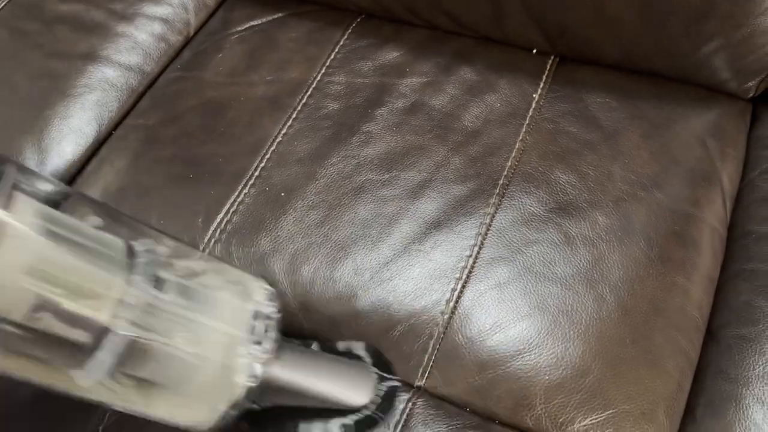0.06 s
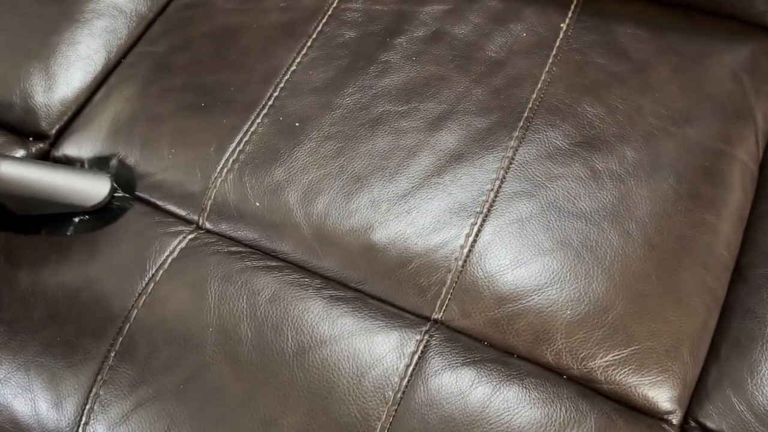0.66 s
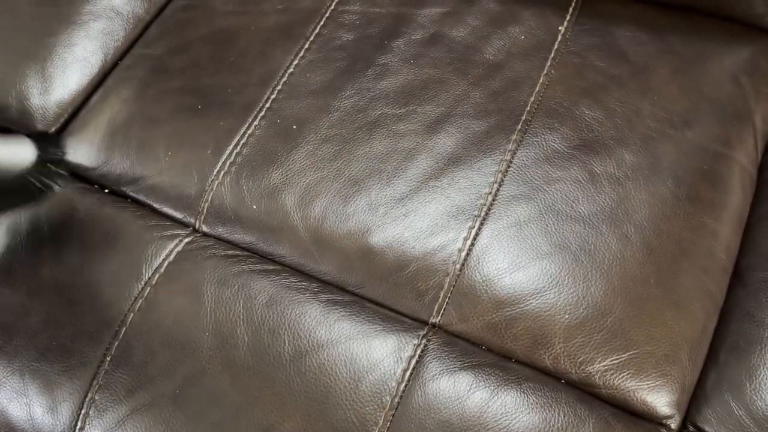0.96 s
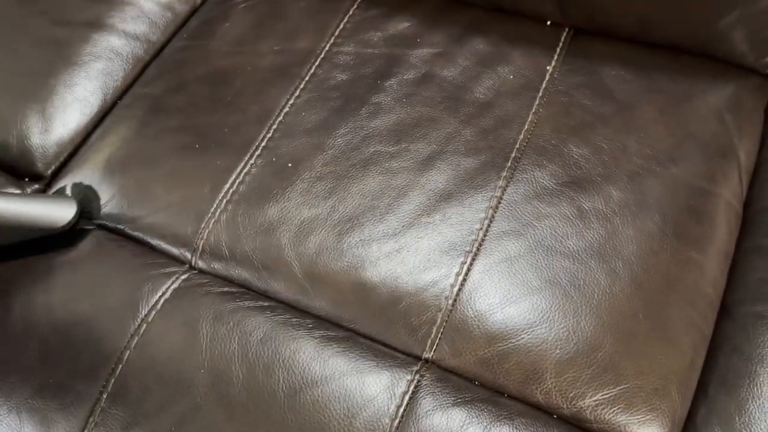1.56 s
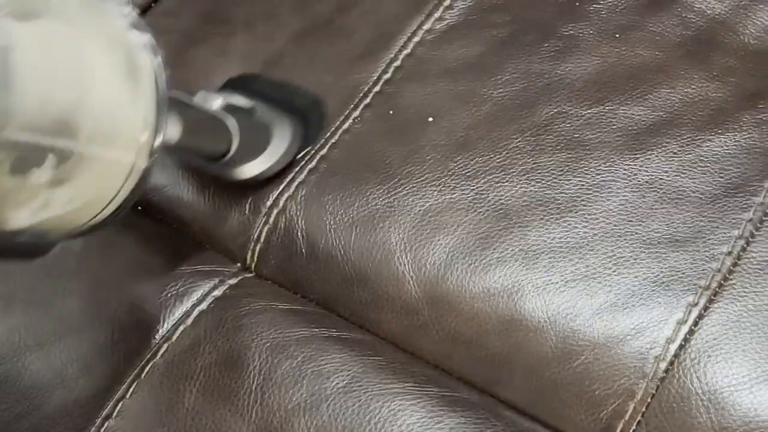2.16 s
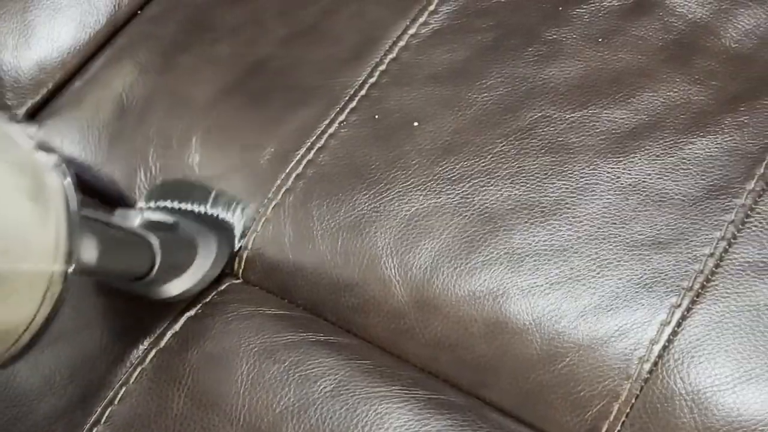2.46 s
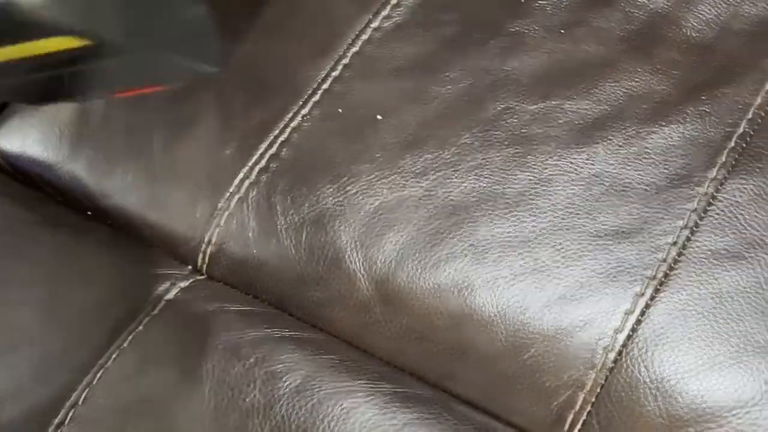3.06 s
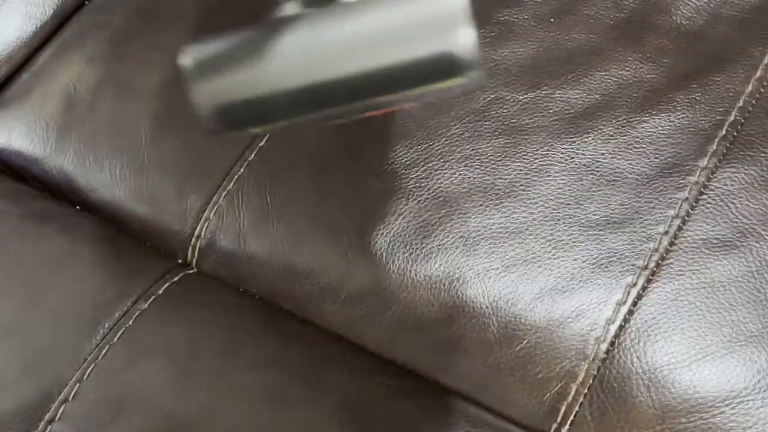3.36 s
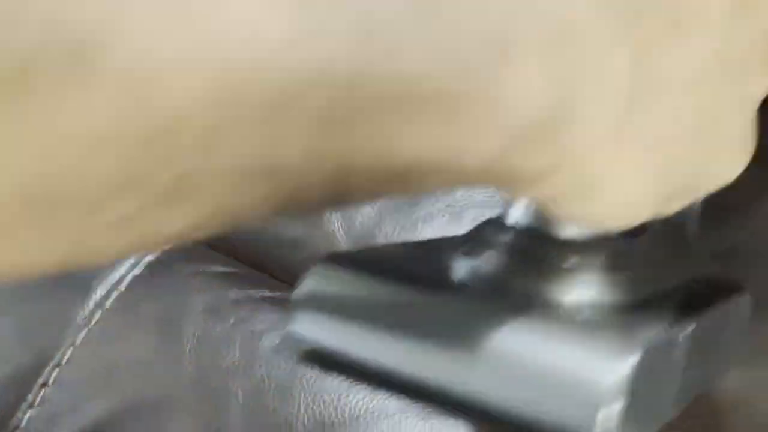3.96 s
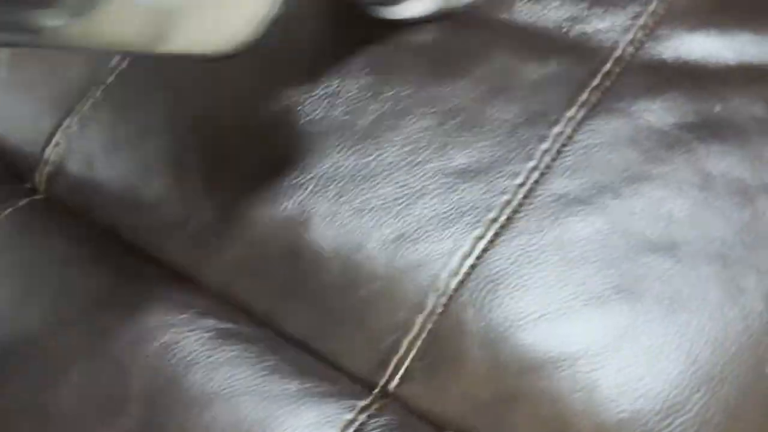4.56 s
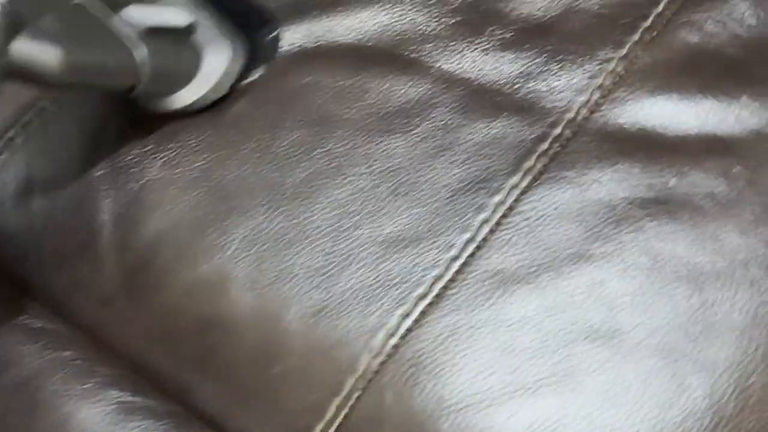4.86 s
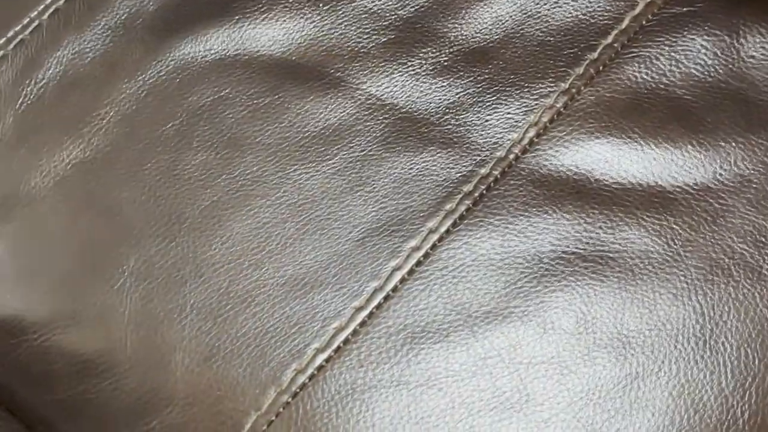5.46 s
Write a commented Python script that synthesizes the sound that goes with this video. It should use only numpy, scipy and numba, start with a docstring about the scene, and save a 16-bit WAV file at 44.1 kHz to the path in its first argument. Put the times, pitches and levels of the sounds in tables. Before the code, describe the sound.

A cordless vacuum hisses and whines loudly as its brush presses onto a leather sofa and lifts off, with thin whistles of air.

```python
"""A cordless vacuum cleaner brushes a leather sofa, close to a phone; after two seconds it is nearer.
The motor roars and whines; air rushes and hisses through the gap between brush and leather.
Each press seals the brush: the hiss swells, the whine is muffled and the fan, with less air to move,
speeds up. The tube sings a hollow note, slits whistle, the brush cup rings, air surges roughly,
the tool thumps the cushion and the leather squeals, all over a low hum in the room."""
import sys
import numpy as np
from scipy import signal
from scipy.fft import rfft, irfft, next_fast_len
from scipy.io import wavfile
from scipy.ndimage import uniform_filter1d
from numba import njit

SR = 44100
rng = np.random.default_rng(int(sys.argv[2]) if len(sys.argv) > 2 else 0)


def generate_wav(sig):
    """Save sig (samples, or channels by samples) to the path in sys.argv[1] as 16-bit PCM at SR."""
    pcm = np.round(np.clip(np.atleast_2d(sig).T, -1, 1) * 32767).astype(np.int16)
    wavfile.write(sys.argv[1], SR, pcm)


N = 246941
TIME_S = np.arange(N) / SR

# The brush is pressed onto the leather; the last two columns are the speed the fan gains:
# start_s, end_s, sealing_s, leaking_s, start_extra_hz, end_extra_hz
PRESSES = [(0.044, 0.271, 0.017, 0.23, 150.6, 135), (0.372, 0.896, 0.015, 0.03, 149.8, 31),
           (1.122, 1.898, .002, 0.019, 160, 10), (1.999, 2.345, .002, 0.083, 109.8, 72),
           (3.081, 4.311, 0.0059, 0.067, 28, 26), (4.61, 5.7, 0.02, .05, 83.8, 94)]
# Tone colours of the motor's roar, the rush through the tool and the hiss at its rim:
# frequency_hz, relative_db
FAR_ROAR_COLOUR = [(90, -11), (200, -10.5), (390, -14), (520, -7), (700, -2.5), (950, -4), (1400, -6),
                   (2500, -6), (3800, -13.5), (5500, -17.5), (9000, -19), (11500, -22.5), (15500, -29.3)]
FAR_RUSH_COLOUR = [(400, -31), (800, -1.5), (1200, -3.5), (1500, 1), (1900, 0), (2400, -0.5), (3100, 3),
                   (4200, -2), (5500, -6.5), (8000, -37), (15500, -27)]
FAR_HISS_COLOUR = [(800, -17), (2000, -6.5), (2800, -1), (3600, 1), (4600, -3), (5600, -0.1), (7200, -4.5),
                   (8200, -3), (10200, -5), (12000, -13), (15500, -13.5)]
NEAR_ROAR_COLOUR = [(90, -6.5), (200, -5.5), (360, -3), (540, -4.5), (850, 1), (1200, -1), (1800, -2),
                    (2500, 0), (3100, -4), (4500, -0.5), (5100, -8), (9000, -20), (12000, -60),
                    (15500, -10.5)]
NEAR_RUSH_COLOUR = [(500, -22.5), (1200, -4.5), (1600, -3), (2100, -2), (2600, -2), (3200, -2),
                    (3800, -3.5), (4800, -6), (6500, -5.5), (10000, -40), (15500, -39)]
NEAR_HISS_COLOUR = [(1200, -31), (2300, -10.5), (2800, -6.5), (3300, -9.5), (3900, -7.5), (4900, -4.5),
                    (6200, -3.5), (7600, -1), (8500, -1.5), (9300, 0), (10400, -0.5), (11700, -18),
                    (13200, -29), (15300, -5.5)]
# Air gulps past the rim as the brush lands or tips: time_s, length_s, level_db
GULPS = [(0.154, 0.15, -31), (1.156, 0.095, -31.5), (1.942, 0.022, -41), (2.376, 0.088, -29),
         (3.155, 0.039, -28), (4.324, 0.06, -28), (5.45, 0.081, -30)]
# How loud the air is at a fully sealed brush: time_s, rush_db, hiss_db
FAR_AIR_LEVELS = [(0.03, -43, -17), (.1, -25, -28), (.21, -30, -27), (.3, -35.5, -24), (.75, -27.5, -21.5),
                  (.89, -30, -24.5), (1.15, -26, -25), (1.37, -23, -21), (1.43, -42, -24.5),
                  (1.47, -39, -21.5), (1.52, -20.5, -20), (1.62, -33, -22.5), (1.75, -27, -25),
                  (1.82, -29, -25.5), (1.87, -29, -23)]
NEAR_AIR_LEVELS = [(2, -21, -11.5), (2.17, -22, -9), (2.35, -18.5, -13), (3.12, -19.5, -18),
                   (3.19, -26.5, -18.5), (3.28, -18.5, -15), (3.5, -16.5, -16), (3.58, -17, -21),
                   (3.76, -16.5, -14), (3.95, -19, -16), (4.13, -18.5, -11.5), (4.33, -19, -11.5),
                   (4.7, -20, -10), (5.19, -23, -10), (5.44, -20.5, -14), (5.5, -24.5, -18.5),
                   (5.57, -23.5, -11)]
# Tones of the fan's whine; the ninth multiple comes from the blades: shaft_multiple, relative_db
FAN_TONES = [(8, -16), (9, 0)]
# The tube's hollow note: time_s, pitch_hz, level_db
TUBE_NOTE = [(0, 760, -67), (.12, 800, -30.5), (.3, 1050, -54), (.5, 920, -37.5), (.63, 935, -29),
             (.78, 970, -48), (.9, 1010, -32), (1.03, 650, -34.5), (1.16, 860, -36), (1.32, 1120, -31),
             (1.46, 1050, -54), (1.75, 1240, -29.5), (1.82, 1195, -38), (1.92, 902, -41), (2.15, 875, -36),
             (2.4, 550, -43), (3.0, 536, -38), (3.18, 766, -36), (3.6, 636, -34), (3.95, 544.4, -36),
             (4.45, 516, -36), (4.8, 760, -42), (5.2, 864, -37), (5.5, 820, -41)]
# Slits between rim and leather whistle: start_s, end_s, level_db, pitch_hz, glide_hz_per_s, width_hz
SLIT_WHISTLES = [(0.057, .7, -39, 5700, -100, 800), (0.223, 0.857, -33, 8020, 200, 1000),
                 (.36, .72, -36, 9550, 400, 700), (.55, .87, -29, 3750, 0, 900),
                 (0.72, 0.826, -28, 5200, 0, 700), (2.04, 2.22, -23, 7500, 1998, 698),
                 (2.1, 2.49, -27.5, 8100, -400, 1100), (2.52, 2.85, -35, 4400, 200, 800),
                 (3.078, 3.16, -22.5, 9170, 0, 900), (3.38, 3.53, -22, 6550, 0, 1210),
                 (3.42, 3.54, -22, 3490, -500, 450), (3.68, 4.33, -25, 9300, 0, 700),
                 (3.82, 4.08, -22, 7800, 1000, 1800), (4.04, 4.296, -26, 5650, -600, 800),
                 (4.42, 4.66, -26.5, 5700, 600, 1300), (4.5, 4.634, -24, 8200, 0, 2400),
                 (4.64, 5.3, -22, 4000, -600, 800), (4.68, 5.368, -22.5, 6220, -1200, 950),
                 (4.759, 5.226, -20, 7780, -1100, 850), (4.953, 5.281, -19.5, 9300, -200, 600),
                 (5.11, 5.21, -15, 6620, 0, 3010), (5.138, 5.473, -27, 6870, -900, 700),
                 (5.379, 5.48, -18, 5830, 0, 800), (5.534, 5.65, -17.5, 6040, 0, 1000)]
# The brush cup rings: start_s, end_s, level_db, lowest_pitch_hz, glide_hz_per_s, upper_tones_db
CUP_RINGS = [(.072, .24, -24, 1920, -200, -7), (1.13, 1.21, -25, 2020, 0, -1),
             (2.0, 2.37, -17.5, 2650, 400, 2.5), (2.37, 2.48, -23, 2770, -300, 1),
             (2.48, 2.85, -38, 2700, -350, 5), (3.09, 3.32, -22.5, 2530, 0, -1),
             (3.33, 3.6, -22, 2500, -100, 3), (3.64, 3.83, -18.5, 2570, 0, -6),
             (3.86, 4.36, -24.5, 2540, -200, -9), (4.4, 4.6, -30, 2410, 0, 4),
             (4.68, 5.17, -24, 2980, -100, -3), (5.22, 5.39, -18.5, 2950, 500, 0)]
# The tones of the cup: multiple_of_lowest, width_hz, relative_db
CUP_TONES = [(1, 330, -3), (1.41, 620, -5.5), (1.82, 500, -9)]
# Short rough surges of air noise, from bristle rasps and the brush cup's low resonance:
# start_s, end_s, attack_s, level_db, pitch_hz, glide_hz_per_s, width_hz
ROUGH_SURGES = [(0.077, 0.24, .004, -27.5, 2300, -600, 1000), (0.113, 0.16, .006, -26.5, 2700, 0, 1500),
                (1.122, 1.22, .001, -24.5, 2500, 0, 1900), (1.372, 1.405, .004, -17, 3240, 0, 1400),
                (1.489, 1.56, .004, -23.5, 3300, 0, 2600), (1.645, 1.792, 0.0042, -23, 5160, -3500, 2200),
                (1.816, 1.86, 0.0031, -23.5, 4700, 0, 2200), (3.44, 3.556, .01, -27, 1930, 0, 600),
                (3.67, 3.807, 0.0077, -29, 2200, 0, 1000), (3.903, 3.973, .006, -21.5, 1950, 0, 900),
                (4.72, 4.955, .01, -29.5, 2070, 0, 400), (5.3, 5.498, .01, -27.5, 2000, 0, 1200)]
# The tool bumps the cushion: time_s, length_s, pitch_hz, level_db
THUMPS = [(1.125, 0.021, 146, -32.5), (3.103, 0.065, 109, -36.5), (3.628, 0.023, 110, -37),
          (3.924, 0.044, 80, -38), (4.03, 0.05, 85, -32.5), (4.62, 0.036, 131, -40),
          (5.46, 0.075, 129, -41.5)]
# The leather flutters against the rim: time_s, length_s, pitch_hz, level_db
SQUEALS = [(1.381, 0.0077, 3124, -18), (1.389, 0.0049, 3020, -10), (1.396, 0.0055, 3060, -14.5),
           (1.523, 0.015, 3430, -18.5), (1.852, .02, 3040, -29)]
# Bands of noise are swallowed, mostly by tool and cushion, once as the exhaust turns away: start_s, end_s,
# centre_hz, glide_hz_per_s, width_hz, depth_0_to_1
SWALLOWED_BANDS = [(2, 2.5, 5050, 1, 450, 0.46), (2.198, 2.55, 6700, 0, 700, 0.7),
                   (2.5, 3.799, 5120, 0, 480, 0.48), (2.499, 2.87, 1662, 400, 451, 0.51),
                   (2.76, 3.06, 1400, 700, 280, 0.36), (2.87, 3.06, 4250, 0, 1780, 0.4),
                   (3.02, 3.421, 2200, 0, 299.5, 0.23), (3.3, 3.65, 1050, 0, 300, 0.27),
                   (3.75, 4.1, 3122, 600, 400, 0.3), (3.97, 4.35, 1550, 0, 300, .45),
                   (4.17, 4.38, 4300, 0, 400, 0.5), (4.38, 4.85, 5130, 0, 450, .5),
                   (4.548, 5.1, 1840, -450, 280, 0.6), (4.6, 5.0, 7200, -1500, 600, 0.2),
                   (4.95, 5.251, 4700, -1300, 450, 0.4), (5.3, 5.602, 1790, 300, 250, .45)]
# The tube hoots or puffs: start_s, end_s, level_db, pitch_hz, glide_hz_per_s, width_hz
HOOTS = [(2.32, 2.42, -33, 535, 0, 80), (2.55, 2.72, -32.5, 542, 50, 60), (2.867, 3.077, -36, 607, 50, 80),
         (3.12, 3.21, -28, 734, 300, 260), (3.55, 4.33, -34, 733, -60, 420),
         (4.3, 4.601, -38.5, 488, 0, 150.3), (5.392, 5.541, -29, 820, 0, 300),
         (5.39, 5.467, -33, 530, 0, 260)]
# How the two microphone openings hear each position:
# frequency_hz, left_minus_right_db, likeness_0_to_1, left_lead_radians
FAR_MICROPHONES = [(60, 0.4, 0.98, 0.17), (200, 1, 0.72, 0.51), (396, 2, 0.85, 2.45), (704, 10, 0, 2.3),
                   (1320, 0.5, 0.16, 4.8), (2450, 7.5, 0.07, 7.1), (4400, 9, 0, 6.4), (6600, 6, 0, 6.7),
                   (7700, 3.5, 0.33, 5.34), (9240, 1.5, 0.96, 2.74), (11700, -1, 1, 0.12),
                   (15100, -0.5, 1, 3.1)]
NEAR_MICROPHONES = [(60, 0, 1, 0), (300, .1, .88, .1), (700, -.6, .72, .4), (1300, -.5, .9, -.1),
                    (2000, .2, .97, -.1), (3100, 2, .25, -.2), (4000, 1.3, .56, -.3), (4800, .6, .12, -.3),
                    (6200, .3, .75, -.3), (9300, -.1, .9, -1.4), (10600, 0, .83, -2.3),
                    (11600, 0, .97, -3.1), (13800, 0, .97, -3.2), (15500, 0, .7, -4.1)]

VENT_PASS = (2.83, .13, 3.8)  # the exhaust vents face the listener: time_s, length_s, whine_boost_db
HOUSING_PASS = (3.86, .39, 14.5)  # the motor housing swings close: time_s, length_s, shaft_boost_db
DIRECT_ONLY = np.array([[1], [0]])  # sounds travel in two rows: direct, then scattered


def undb(db):
    """Turn decibels into a plain multiplier."""
    return 10 ** (np.asarray(db) / 20)


def curves(table):
    """Draw each column as straight lines between the times in the first column."""
    times, *columns = np.transpose(table)
    return [np.interp(TIME_S, times, column) for column in columns]


def unit(x):
    """Scale a signal to an average strength (rms) of 1."""
    return x / np.sqrt(np.mean(x ** 2))


def frequencies():
    """The frequencies in a spectrum long enough for the scene."""
    return np.fft.rfftfreq(next_fast_len(N, True), 1 / SR)


def wander(rate_hz):
    """A smooth random wobble of strength 1 that picks rate_hz new values a second."""
    hold = max(int(SR / rate_hz), 2)
    steps = np.repeat(rng.standard_normal(N // hold + 1), hold)
    return unit(uniform_filter1d(uniform_filter1d(steps, hold), hold)[:N])


def swell(time_s, length_s):
    """A smooth bump around time_s."""
    return np.exp(-2 * ((TIME_S - time_s) / length_s) ** 2)


def rise(time_s, fade_s):
    """A soft step from 0 to 1 around time_s."""
    return .5 + .5 * np.tanh((TIME_S - time_s) / (2 * fade_s))


def gate(start_s, end_s, attack_s, release_s):
    """Fade in around the start and out around the end."""
    return rise(start_s, attack_s) * (1 - rise(end_s, release_s))


def slide(start_s, end_s, hz, glide_hz_per_s):
    """A pitch that glides from start to end and holds still otherwise."""
    return hz + glide_hz_per_s * (np.clip(TIME_S, start_s, end_s) - start_s)


def air(colour, low_cut_hz=60):
    """Swirling air: two unrelated noises with the given tone colour and no deep bass."""
    hz, db = np.transpose(colour)
    freq = frequencies() + 1
    gain = undb(np.interp(np.log(freq), np.log(hz), db)) / np.sqrt(1 + (low_cut_hz / freq) ** 8)
    real, imag = rng.standard_normal((2, 2, len(gain)))
    return unit(irfft(gain * (real + 1j * imag))[:, :N])


@njit
def resonate(x, hz, width_hz):
    """Let through only a band around a moving pitch (a state-variable filter)."""
    out, band_state, low_state = np.empty(len(x)), 0., 0.
    for i in range(len(x)):
        tuning, damping = np.tan(np.pi * hz[i] / SR), width_hz / hz[i]
        band = (band_state + tuning * (x[i] - low_state)) / (1 + tuning * (tuning + damping))
        band_state = 2 * band - band_state
        low_state += 2 * tuning * band
        out[i] = damping * band
    return out


def hollow(hz, width_hz):
    """A breathy note: two unrelated noises, each filtered twice around a pitch."""
    width_hz = float(width_hz)
    noises = rng.standard_normal((2, N))
    return unit(np.array([resonate(resonate(x, hz, width_hz), hz, width_hz) for x in noises]))


def jet(start_s, end_s, attack_s, release_s, db, hz, glide, width_hz):
    """One breathy, gliding note that fades in and out."""
    pitch = slide(start_s, end_s, hz, glide)
    return undb(db) * gate(start_s, end_s, attack_s, release_s) * hollow(pitch, width_hz)


def pressing(spin_lag_s=.095):
    """How well the brush seals (0 to 1), and the fan's extra speed, which lags through inertia."""
    seal, target_hz = np.zeros((2, N))
    for start, end, sealing_s, leaking_s, *extra_hz in PRESSES:
        seal += rise(start, sealing_s) * np.exp(-np.maximum(TIME_S - end, 0) / leaking_s)
        target_hz += np.interp(TIME_S, [start, end], extra_hz, left=0, right=0)
    keep = np.exp(-1 / (spin_lag_s * SR))
    return np.clip(seal, 0, 1), signal.lfilter([1 - keep], [1, -keep], target_hz)


def motor_roar(colour, extra_hz, free_db, drop_db_per_hz, waver_db):
    """The exhaust roars; it sinks as the choked fan speeds up, and swells with each gulp."""
    gulps = sum(undb(db) * swell(time, length) for time, length, db in GULPS)
    roar_db = free_db - drop_db_per_hz * extra_hz + waver_db * wander(9)
    return (undb(roar_db) + gulps) * air(colour)


def suction(levels, rush_colour, hiss_colour, seal, free_rush_db, free_hiss_db, rush_power, grain_db):
    """Rush and hiss grow with the seal; the bristles make the gap flutter."""
    rush_db, hiss_db = curves(levels)
    rush = np.hypot(undb(free_rush_db), undb(rush_db) * seal ** rush_power)  # a power below 1 lingers
    hiss = np.hypot(undb(free_hiss_db), undb(hiss_db) * seal)
    flutter = undb(.94 * wander(45) + grain_db * wander(500))
    return flutter * (rush * air(rush_colour) + hiss * air(hiss_colour))


def fan_whine(seal, extra_hz, free_db, sealed_db, shaft_db, free_hz=1169.5, flicker_db=1.8):
    """The blades whine, loudest when air flows freely, over the shaft's lower note; both waver."""
    housing_db, vent_db = (db * swell(time, length) for time, length, db in (HOUSING_PASS, VENT_PASS))
    shaft_hz = (free_hz + extra_hz) * (1 + .0006 * wander(120))
    angle = 2 * np.pi * np.cumsum(shaft_hz) / SR
    muffling = seal ** 1.4  # the whine returns as soon as the seal loosens
    whine_db = free_db + vent_db + (sealed_db - free_db) * muffling
    whine = sum(undb(whine_db + db + flicker_db * wander(44.64)) * np.sin(multiple * angle)
                for multiple, db in FAN_TONES)
    shaft = undb(shaft_db + housing_db + flicker_db * wander(19)) * np.sin(angle + .25 * wander(37))
    return np.sqrt(2) * (whine + shaft) * DIRECT_ONLY


def room_hum(pitch_hz=52.6, level_db=-47):
    """A low, steady hum in the room."""
    return np.sqrt(2) * undb(level_db + .35 * wander(4.2)) * np.sin(2 * np.pi * pitch_hz * TIME_S)


def tube_note(width_hz=270):
    """The flow blows a hollow note from the air inside the tube."""
    hz, db = curves(TUBE_NOTE)
    return undb(db) * hollow(hz, width_hz)


def slit_whistles(flicker_db=2.5, fade_s=.015):
    """Narrow jets at the rim, half hiss and half whistle, gliding as the brush slides."""
    flicker = undb(flicker_db * wander(40))
    return flicker * sum(jet(start, end, fade_s, fade_s, *sound) for start, end, *sound in SLIT_WHISTLES)


def cup_ring(fade_s=.01, tremble=.013):
    """Air rings the brush cup; how it lies sets the tone, and the pitch trembles with the hand."""
    start, end, db, hz, glide, upper_db = np.transpose(CUP_RINGS)[:, :, None]
    gates = gate(start, end, fade_s, fade_s) + 1e-9
    shares = gates / gates.sum(axis=0)  # blends each ring into the next
    gain = np.sum(undb(db) * gates, axis=0)
    pitch = np.sum(slide(start, end, hz, glide) * shares, axis=0) * (1 + tremble * wander(22))
    brightness = undb(np.sum(upper_db * shares, axis=0))
    lowest, *upper = (undb(tone_db) * hollow(multiple * pitch, width_hz)
                      for multiple, width_hz, tone_db in CUP_TONES)
    return gain * (lowest + brightness * sum(upper))


def rough_surges(release_s=.0091, rough_db=2):
    """Short rough surges of air noise: bristle rasps and the brush cup's low resonance."""
    grain = undb(rough_db * wander(250))
    return grain * sum(jet(start, end, attack, release_s, *sound)
                       for start, end, attack, *sound in ROUGH_SURGES)


def cushion_thumps(width_hz=110):
    """The tool lands soft, dull blows on the padded cushion."""
    return sum(undb(db) * swell(time, length) * hollow(np.full(N, float(hz)), width_hz)[0]
               for time, length, hz, db in THUMPS)


def leather_squeals(pitch_wobble=.0305, rough_db=2, rasp_db=-4):
    """Leather drawn against the rim sings briefly with an unsteady pitch, and air rasps past it."""
    wobbly_time = np.cumsum(1 + pitch_wobble * wander(900)) / SR
    strength = np.sqrt(2) * undb(rough_db * wander(300)) * DIRECT_ONLY
    rasp = undb(rasp_db) * air([(400, -25), (1000, -2), (3800, 2), (5800, 2), (8000, -23)])
    return sum(undb(db) * swell(time, length) * (strength * np.sin(2 * np.pi * hz * wobbly_time) + rasp)
               for time, length, hz, db in SQUEALS)


def swallow_bands(x, fade_s=.03):
    """Tool and cushion cancel bands of noise; the gaps open, slide and close as the tool tips. One broad band
    near 4.3 kHz sinks briefly as the cleaner turns its exhaust away."""
    for start, end, hz, glide, width_hz, depth in SWALLOWED_BANDS:
        centre_hz = slide(start, end, hz, glide)
        band = np.array([resonate(row, centre_hz, float(width_hz)) for row in x])
        x = x - depth * gate(start, end, fade_s, fade_s) * band
    return x


def tube_hoots(fade_s=.014):
    """The tube's note stands out: a breathy hoot over a still gap, a broad puff over a moving one."""
    return sum(jet(start, end, fade_s, fade_s, *sound) for start, end, *sound in HOOTS)


def cushion_echo(x, lag_s, sway, share=.17):
    """The cushion throws sound back; the delay shifts with the hand, rippling the tone colour."""
    now = np.arange(N)
    earlier = now - lag_s * SR * np.exp(sway * wander(1.5))
    echo = np.array([np.interp(earlier, now, row) for row in x])
    return (x + share * echo) / np.sqrt(1 + share ** 2)


def room_echoes(x, share=.045):
    """Furniture and walls send back a few faint, quick echoes that roughen the tone colour."""
    lags = rng.integers(int(.004 * SR), int(.03 * SR), size=8)
    echoes = sum(np.pad(x, ((0, 0), (lag, 0)))[:, :N] for lag in lags)
    return (x + share * echoes) / np.sqrt(1 + len(lags) * share ** 2)


def microphones(pair, table):
    """The left hears the direct sound; the right hears a shifted share of it plus scattered sound."""
    hz, *columns = np.transpose(table)
    balance_db, likeness, lead = (np.interp(frequencies(), hz, column) for column in columns)
    balance = undb(balance_db)
    direct, scattered = rfft(pair, next_fast_len(N, True))
    right = likeness * np.exp(-1j * lead) * direct + np.sqrt(1 - likeness ** 2) * scattered
    return irfft(np.array([balance * direct, right]) * np.sqrt(2 / (1 + balance ** 2)))[:, :N]


def far_cleaner(seal, extra_hz, tool_sounds):
    """The cleaner further off, to the left; its air noise bounces off the cushion, then the room."""
    roar = motor_roar(FAR_ROAR_COLOUR, extra_hz, free_db=-29, drop_db_per_hz=.1, waver_db=.8)
    sucking = suction(FAR_AIR_LEVELS, FAR_RUSH_COLOUR, FAR_HISS_COLOUR, seal,
                      free_rush_db=-35.5, free_hiss_db=-44, rush_power=.61, grain_db=1.04)
    tones = fan_whine(seal, extra_hz, free_db=-44.5, sealed_db=-52, shaft_db=-42.5) + leather_squeals()
    airflow = cushion_echo(roar + sucking + tool_sounds, lag_s=.0022, sway=.222)
    return microphones(room_echoes(airflow) + tones, FAR_MICROPHONES)


def near_cleaner(seal, extra_hz, tool_sounds):
    """The cleaner close in front: louder, and near enough to hear the swallowed bands."""
    roar = motor_roar(NEAR_ROAR_COLOUR, extra_hz, free_db=-23.5, drop_db_per_hz=.04, waver_db=1.15)
    sucking = suction(NEAR_AIR_LEVELS, NEAR_RUSH_COLOUR, NEAR_HISS_COLOUR, seal,
                      free_rush_db=-36, free_hiss_db=-29.5, rush_power=.29, grain_db=.13)
    tones = fan_whine(seal, extra_hz, free_db=-25, sealed_db=-44, shaft_db=-45)
    airflow = cushion_echo(swallow_bands(roar + sucking + tool_sounds), lag_s=.0018, sway=.253)
    return microphones(room_echoes(airflow) + tones, NEAR_MICROPHONES)


def scene(move_s=2.001):
    """The cleaner further off, then near, with a very short break in between."""
    seal, extra_hz = pressing()
    tool_sounds = tube_note() + tube_hoots() + cup_ring() + slit_whistles() + rough_surges()
    fade_out = np.clip((move_s - .007 - TIME_S) / .025, 0, 1)
    fade_in = np.clip((TIME_S - move_s) / .001, 0, 1)
    far = fade_out * far_cleaner(seal, extra_hz, tool_sounds)
    near = fade_in * near_cleaner(seal, extra_hz, tool_sounds)
    return far + near + cushion_thumps() + room_hum()


def record(dry, top_hz=15800):
    """The phone clips the tallest peaks and cuts the highest treble."""
    treble_cut = signal.ellip(10, .2, 70, top_hz, fs=SR, output="sos")
    return signal.sosfilt(treble_cut, np.clip(dry, -1, 1))


dry = scene()
out = record(dry)
generate_wav(out)
```